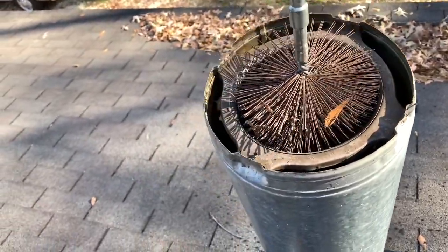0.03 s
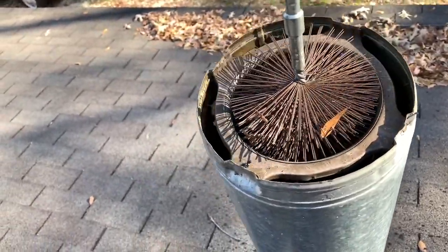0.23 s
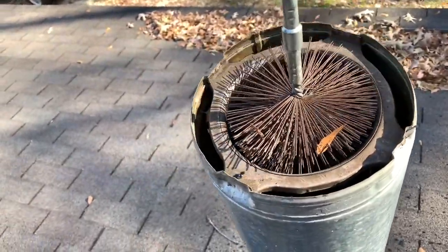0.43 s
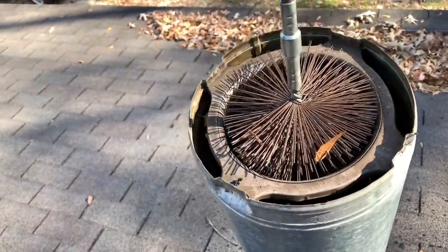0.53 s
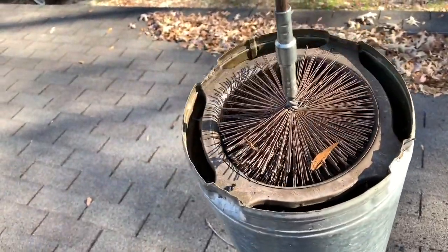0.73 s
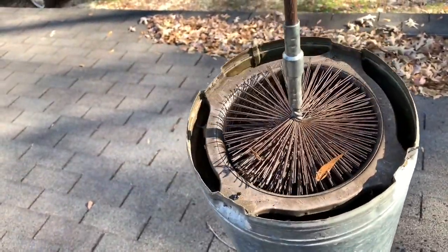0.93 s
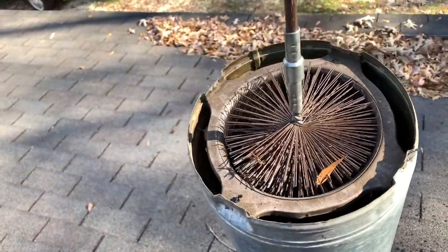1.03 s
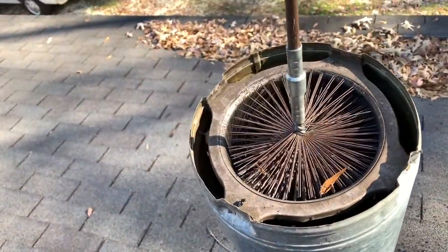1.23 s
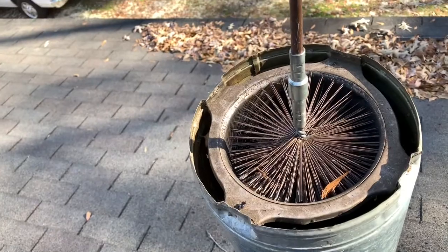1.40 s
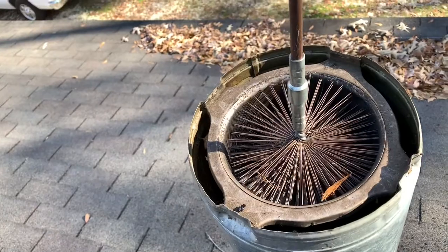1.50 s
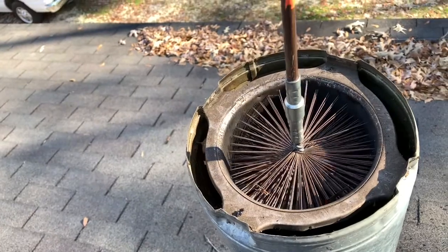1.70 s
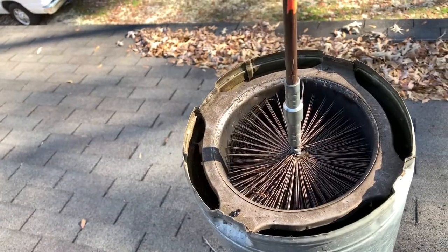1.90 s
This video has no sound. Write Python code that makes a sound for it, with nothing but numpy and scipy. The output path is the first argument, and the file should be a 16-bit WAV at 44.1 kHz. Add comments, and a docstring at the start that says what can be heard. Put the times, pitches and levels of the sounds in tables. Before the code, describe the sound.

A stiff wire brush scrapes inside a metal pipe in short uneven strokes, bright hiss with a raspy, faintly ringing edge; two small pole knocks early on, low wind buffeting the close outdoor microphone.

```python
"""On a roof, a round wire brush is worked into the mouth of a metal stovepipe in short strokes.
Bristle tips skip over the wall and hiss brightly: random slips are filtered to the treble.
More random slips make the wall rasp and the pipe ring; the pole knocks twice, by short noisy contacts.
A short low tone sounds once. Wind buffets the microphones with low noise and single thumps, over a faint hush."""
import sys
import numpy as np
from scipy import signal
from scipy.fft import rfft, irfft, next_fast_len
from scipy.io import wavfile
from scipy.ndimage import uniform_filter1d, map_coordinates

SR = 44100
rng = np.random.default_rng(int(sys.argv[2]) if len(sys.argv) > 2 else 0)


def pcm_store(signal):
    """Save signal as 16-bit PCM."""
    levels = np.round(np.clip(np.atleast_2d(signal), -1, 1) * 32767)
    wavfile.write(sys.argv[1], SR, levels.astype(np.int16).T)


def boost_factor(decibels):
    """Convert a level in decibels to a linear amplitude factor."""
    exponent = np.asarray(decibels, float) / 20
    return 10 ** exponent


N = 85995  # length in samples


def unit(x):
    """Scales a signal to an average strength (rms) of 1."""
    return x / np.sqrt(np.mean(x ** 2) + 1e-20)


def along(points, hz):
    """Reads a curve of (frequency, value) points on a log frequency axis."""
    f, v = np.transpose(points)
    return np.interp(np.log(hz + 1), np.log(f + 1), v)


def curves(rows):
    """Gives one value per sample for each column after the time."""
    s, *columns = np.transpose(rows)
    return [np.interp(np.arange(N) / SR, s, column) for column in columns]


def wobble(rate):
    """Draws a smooth random curve with `rate` random points a second."""
    points = rng.standard_normal(int(N * rate / SR) + 4)
    return map_coordinates(points, [np.arange(N) * rate / SR])


def filtered(x, response):
    """Multiplies the spectrum of x by a response that depends on frequency."""
    m = next_fast_len(N + SR // 2)
    return irfft(rfft(x, m) * response(np.fft.rfftfreq(m, 1 / SR)), m)[..., :N]


def left_right(mid, side, side_db):
    """Builds two channels from a part they share and a part that is opposite in them."""
    return np.array([mid + boost_factor(side_db) * side, mid - boost_factor(side_db) * side])


def skips(per_s, spread_db, clump_db):
    """Makes two streams of tiny slips of uneven size that swell in shared clumps."""
    chance, sign, size = rng.random((3, 2, N))
    slips = (chance < per_s / SR) * np.sign(sign - .5)
    slips = slips * boost_factor(-spread_db * np.log(size + 1e-9))
    return unit(slips * boost_factor(clump_db * (wobble(250) + wobble(40.15))))


def patchy(x, depth_db):
    """Shifts the colour in random patches, as other bristles take over."""
    spectrum = signal.stft(x, nperseg=256)[2]
    field = rng.standard_normal(spectrum.shape[1:])
    field = uniform_filter1d(field, size=5, axis=0)  # smooth over frequency
    field = uniform_filter1d(field, size=12, axis=1)  # smooth over time
    return signal.istft(spectrum * boost_factor(depth_db * unit(field)), nperseg=256)[1][:, :N]


def streaky(x, depth_db):
    """Makes narrow bands stand out for a moment, as single wires and wall modes catch."""
    spectrum = signal.stft(x, nperseg=1024)[2]
    field = uniform_filter1d(rng.standard_normal(spectrum.shape[1:]), size=3, axis=1)
    gain = boost_factor(depth_db * unit(field))
    return signal.istft(spectrum * unit(gain), nperseg=1024)[1][:, :N]


def far_hush():
    """A faint, steady outdoor hush is noise with a fixed colour, separate left and right."""
    # colour of the hush: (frequency [Hz], relative level [dB])
    air = [(300, -120), (400, 7), (1000, -3), (4000, -5), (8000, -11), (15000, -8)]
    hush = filtered(rng.standard_normal((2, N)), lambda hz: boost_factor(along(air, hz)))
    return boost_factor(-48.5) * unit(hush)


def wind():
    """Low noise buffets both microphones nearly alike; its shared part gives way to single thumps."""
    # strength of the buffeting: (time [s], relative level [dB])
    gusts = [(0.0, -45.5), (0.14, -36), (0.184, -42.5), (0.248, -34.5), (0.324, -36.5), (.47, -35),
             (.53, -28.5), (0.586, -22), (0.662, -41.5), (0.858, -35.5), (0.922, -41.5), (1.14, -34.5),
             (1.28, -32), (1.33, -38.5), (1.438, -39), (1.466, -34), (1.548, -39.5), (1.612, -36),
             (1.682, -40), (1.91, -46), (1.95, -40.5)]
    # colour of the buffeting: (frequency [Hz], relative level [dB])
    buffet = [(15, -35), (25, -39), (43, 3), (162, -1), (233, -6.5), (264, -9.5), (330, -11.5), (436, -13),
              (700, -27.5), (910, -33), (1540, -120)]
    # strongest gust thumps: (time [s], peak level [dB], frequency [Hz])
    thump_rows = [(0.24, -23.5, 73), (.420, -23, 97), (0.515, -22.5, 132), (0.545, -17, 147),
                  (0.565, -19, 174), (0.587, -16, 120), (.696, -26.5, 77.4), (1.157, -26, 94),
                  (1.184, -23, 72), (1.21, -25.5, 380), (1.228, -30, 200), (1.258, -26, 226),
                  (1.270, -24.5, 84), (1.289, -25, 320), (1.303, -30, 130), (1.467, -23, 74.5),
                  (1.49, -25.5, 89), (1.51, -26, 64.4), (1.605, -23.5, 91)]
    thump_cycles = 0.52  # time from a thump's middle until it has fallen to 1/e, in cycles

    level_db, = curves(gusts)
    noise = rng.standard_normal((2, N)) * boost_factor(1.88 * wobble(60.12))
    mid, side = filtered(noise, lambda hz: boost_factor(along(buffet, hz)))

    t = np.arange(N) / SR
    cycles = np.array([(t - s) * hz for s, db, hz in thump_rows])
    bell = np.exp(-(cycles / thump_cycles) ** 2)
    peaks = boost_factor(np.array(thump_rows)[:, 1:2])
    thumps = -(peaks * np.cos(2 * np.pi * cycles) * bell).sum(axis=0)

    mid = unit(mid) * (1 - bell.max(axis=0))  # make room for the thumps
    buffeting = left_right(mid, unit(side), side_db=-15.5)
    return boost_factor(level_db - 1) * buffeting + thumps


def knock(start_s, ring_peak_db, rise_s, rattle_t60_s, modes, crack_db):
    """A short rattling contact drives the modes of what it strikes and cracks on its own."""
    t = np.arange(SR // 5) / SR
    envelope = boost_factor(-60 * t / rattle_t60_s) * (1 - np.exp(-(t / rise_s) ** 2))
    touch = rng.standard_normal((3, len(t))) * envelope
    ring = np.zeros(len(t))
    for hz, db, t60 in modes:
        mode = boost_factor(-60 * t / t60) * np.sin(2 * np.pi * hz * t)
        ring += boost_factor(db) * unit(signal.fftconvolve(touch[0], mode)[:len(t)])
    # the ring is the same left and right, the crack is not
    sound = ring / np.abs(ring).max() + boost_factor(crack_db) * touch[1:]
    return boost_factor(ring_peak_db) * np.pad(sound, [(0, 0), (round(start_s * SR), N)])[:, :N]


def low_tone():
    """A short low tone during a long stroke is one mode driven by a noisy contact."""
    # the mode: (frequency [Hz], relative level [dB], time to fall by 60 dB [s])
    tone = [(550, 0, .09)]
    return knock(1.074, -36, rise_s=.008, rattle_t60_s=.08, modes=tone, crack_db=-40)


def joint_chink():
    """The pole joint chinks: a brief rattle rings its high modes."""
    # modes of the joint: (frequency [Hz], relative level [dB], time to fall by 60 dB [s])
    joint = [(2536, -9, .04), (3564, 0, .07), (3984, -2, .06)]
    return knock(.5155, -24, rise_s=.002, rattle_t60_s=.022, modes=joint, crack_db=-14)


def rim_bump():
    """The pole bumps the rim: a slower contact rings lower modes that die quickly."""
    # modes of the rim: (frequency [Hz], relative level [dB], time to fall by 60 dB [s])
    rim = [(800, -7, .03), (1020, -8, .02), (1200, 0, .022), (1550, -1, .016)]
    return knock(.762, -20, rise_s=.005, rattle_t60_s=.028, modes=rim, crack_db=-15)


def pipe_ring(hiss_db, ring_db):
    """Slips keep the pipe ringing: each mode answers strongly only near its own frequency."""
    # modes of the pipe: (frequency [Hz], width [Hz], relative level [dB])
    pipe = [(608, 290, -18), (870, 300, -17.5), (1321, 181, -11), (1378.6, 17, 0), (1413, 20, 2.5),
            (1490, 29, -1.5), (1550, 29, -4.5), (1613, 31, -3.5), (1674, 74, -10)]

    def response(f):
        total = 0
        for k, (centre, width, db) in enumerate(pipe):
            damping = 1j * f * width
            # neighbouring modes have opposite signs
            total = total + (-1) ** k * boost_factor(db) * damping / (centre ** 2 - f ** 2 + damping)
        return total

    slips = skips(per_s=5000, spread_db=2.0, clump_db=1.0) * boost_factor(hiss_db + ring_db)
    ring = boost_factor(22.0) * filtered(slips, response)
    return left_right(*streaky(ring, depth_db=4.0), side_db=-10)


def wall_rasp(hiss_db, low_db, high_db, snap_level):
    """Slips and snaps make the wall rasp, with separate strengths below and above a split."""
    # rasp alike left and right: (frequency [Hz], relative level [dB])
    rasp_mid = [(1060, -26.5), (1800, -8), (1880, -13), (2020, -13), (2460, -0.5), (2680, -2.5),
                (3040, -1.5), (3300, -4.5), (3640, -2.5), (4110, -6), (4760, -9.5), (5440, -15),
                (6260, -4.5), (7690, -10), (8300, -10), (10800, -27), (18300, -120)]
    # rasp opposite left and right: (frequency [Hz], relative level [dB])
    rasp_side = [(1060, -26), (1800, -28), (2140, -1), (2380, -9), (2630, 3.5), (3260, -22), (3500, -4),
                 (4000, -15), (4850, -0.5), (5270, -15), (6030, -7), (6940, -13), (7690, -4), (8300, -15),
                 (10800, -25), (18300, -120)]
    split_hz = 4700

    slips = patchy(skips(per_s=9000, spread_db=2.0, clump_db=0.43), depth_db=3.0)

    def drive(db):
        return slips * np.hypot(boost_factor(hiss_db + db), boost_factor(-14.5) * snap_level)

    def colour(hz):
        return boost_factor([along(rasp_mid, hz), along(rasp_side, hz)])

    low = filtered(drive(low_db), lambda hz: colour(hz) * (hz < split_hz))
    high = filtered(drive(high_db), lambda hz: colour(hz) * (hz >= split_hz))
    wall = boost_factor(12) * low + boost_factor(15.0) * high
    return left_right(*streaky(wall, depth_db=4.0), side_db=0)


def bristle_tips(hiss_db, snap_level, snaps):
    """Tips skip over the wall and hiss brightly; each snap opens with a tick."""
    # colour of the hiss: (frequency [Hz], relative level [dB])
    tips = [(7300, -31), (7900, -10.5), (8500, 1.5), (9500, 1), (10800, 0.5), (12500, -2.5), (13500, -4),
            (14500, -6), (15600, -19.5)]
    alike = 0.97  # likeness of the slips left and right, 0 to 1
    right_lead_s, in_step_hz = 0.00032, 10195  # lead of the right; frequency where both are in step

    slips = skips(per_s=16000, spread_db=2.5, clump_db=1) * np.hypot(boost_factor(hiss_db), snap_level)
    shared, opposite = patchy(slips, depth_db=1.0)
    for s, db in snaps:
        shared[round(s * SR)] += boost_factor(db + 8)  # the first bristle of the snap
    turn = np.arccos(alike) / 2
    pair = left_right(np.cos(turn) * shared, np.sin(turn) * opposite, side_db=0)

    def response(hz):
        colour = boost_factor(along(tips, hz)) * (hz > tips[0][0])
        phase = np.pi * right_lead_s * (hz - in_step_hz) * np.array([[-1], [1]])
        return colour * np.exp(1j * phase)

    return boost_factor(8.5) * filtered(pair, response)


def brush():
    """Each stroke drives the tips, wall and pipe; sudden releases of bristles add to tips and wall."""
    # the strokes: (time [s], relative hiss level [dB], then relative to that hiss:
    # lower wall rasp [dB], upper wall rasp [dB], pipe ring [dB])
    strokes = [(0.0, -69.5, 2, -9, 20), (0.042, -41, -8, -1, -8), (0.102, -33, -2.5, -7, -6),
               (0.19, -33, -7, -3.5, 0), (0.222, -55, 5, 2, 10), (0.254, -49.5, -5, -6, -2.5),
               (0.27, -31, -10, -9, -5), (0.308, -27, -2, -3, -8), (0.38, -27, -8.5, -6.5, -5.5),
               (0.39, -40.5, -4, -2, 1), (0.498, -51, -2, -4, 2.5), (0.52, -37.5, -17, -4, -15),
               (0.536, -49.5, -1.5, -1, -1.5), (0.63, -27, -9.5, -14.5, -7.5), (0.748, -41, -6, -12, -7.5),
               (0.76, -33, -6, -14, 4), (0.77, -41.5, -2.5, -8, -2), (0.802, -23.5, -13.5, -17.5, -14),
               (0.858, -28, -8, -17, -4.5), (0.912, -51, -0.5, -5.5, 6), (0.928, -36, -9.5, -20, -4.5),
               (1.022, -29.5, -8, -13, -6), (1.056, -23, -12, -14.5, -6.5), (1.112, -21.5, -11, -14, -13),
               (1.152, -21.5, -13.5, -13.5, -12), (1.198, -29.5, -9, -14.5, -5),
               (1.212, -36.5, -10.5, -12, -3.5), (1.31, -50, -9, -12, -2), (1.332, -28.5, -9, -18, -10.5),
               (1.384, -22, -10, -16, -8), (1.476, -47, -5.5, -8, -6.5), (1.488, -32.5, -13, -18, -8.5),
               (1.542, -24, -5, -12.5, -9.5), (1.604, -44.5, -8, -12.5, 0), (1.634, -19, -12, -15, -16.5),
               (1.656, -20, -6, -9, -10), (1.754, -20.5, -11, -10.5, -8), (1.792, -43.5, 1.5, 1.5, 5.5),
               (1.852, -45, -3, -6.5, -4), (1.95, -43.5, -6, -5, -7)]
    # a bunch of bristles lets go at once: (time [s], relative level [dB])
    snaps = [(0.0253, -39), (0.269, -21), (.290, -19.5), (0.312, -18.5), (.758, -29), (.803, -26),
             (.876, -23), (0.925, -32), (0.951, -26), (0.9777, -30), (1.001, -19.5), (1.04, -15.5),
             (1.0784, -32), (1.1987, -22), (1.328, -21.5), (1.3668, -20), (1.487, -22), (1.513, -24),
             (1.589, -28), (1.626, -19), (1.7442, -31), (1.8416, -31), (1.875, -29)]
    snap_t60_s = 0.028  # time for a snap to fall by 60 dB

    hiss_db, low_db, high_db, ring_db = curves(strokes)
    t = np.arange(N) / SR
    snap_level = np.zeros(N)
    for s, db in snaps:
        snap_level += boost_factor(db - 60 * np.maximum(t - s, 0) / snap_t60_s) * (t > s)

    ring = pipe_ring(hiss_db, ring_db)
    rasp = wall_rasp(hiss_db, low_db, high_db, snap_level)
    return ring + rasp + bristle_tips(hiss_db, snap_level, snaps)


def scene():
    """Adds hush, wind, a short tone, two knocks and the brush."""
    background = far_hush() + wind()
    knocks = joint_chink() + rim_bump()
    return background + low_tone() + knocks + brush()


def band_limit(x):
    """A steep low-pass at the top of the band."""
    return signal.sosfilt(signal.butter(12, 15800, fs=SR, output="sos"), x)


def record(dry):
    """The camera keeps nothing above its band limit."""
    mix = filtered(dry, lambda hz: hz < 15800)
    return band_limit(mix)


dry = scene()
out = record(dry)
pcm_store(out)
```